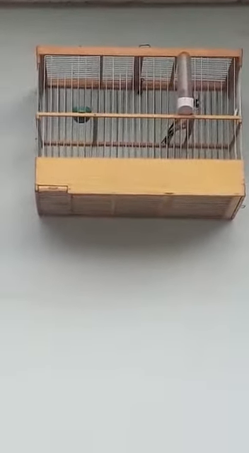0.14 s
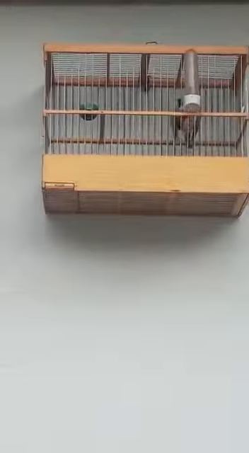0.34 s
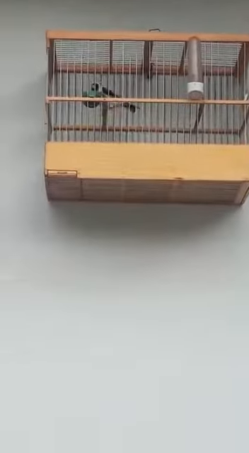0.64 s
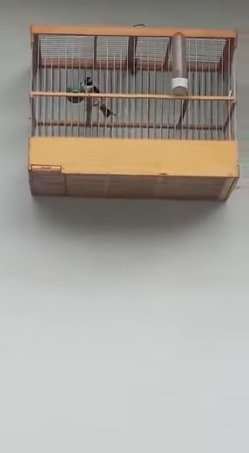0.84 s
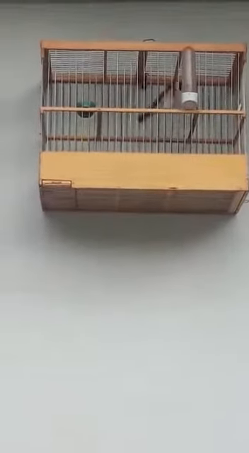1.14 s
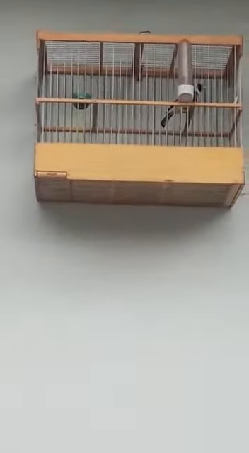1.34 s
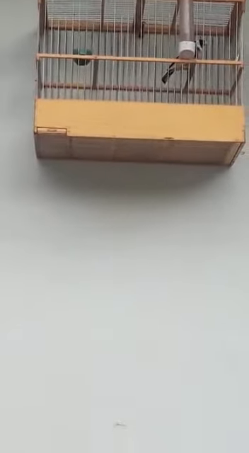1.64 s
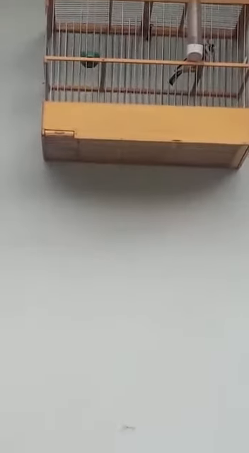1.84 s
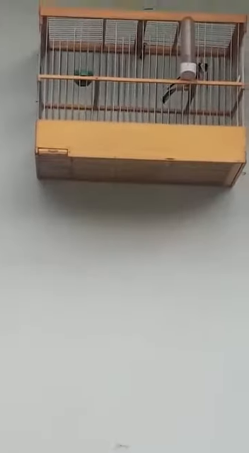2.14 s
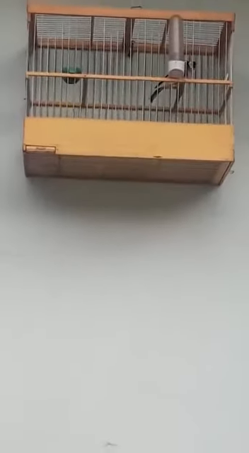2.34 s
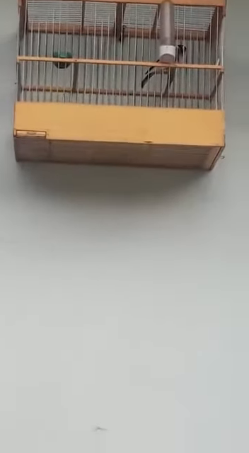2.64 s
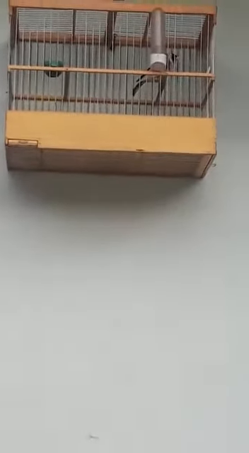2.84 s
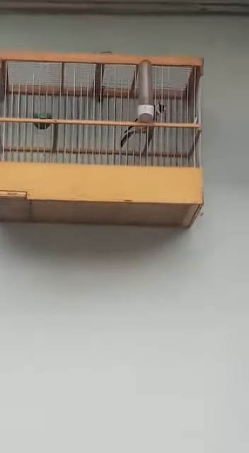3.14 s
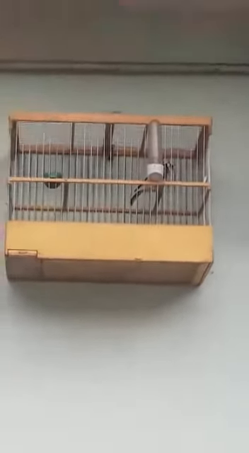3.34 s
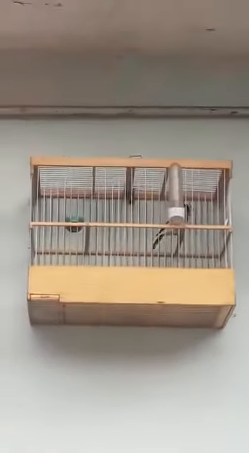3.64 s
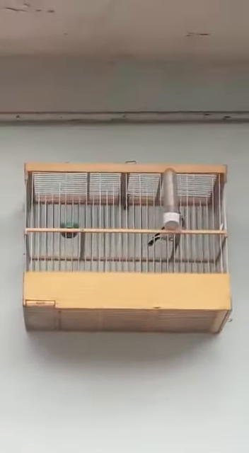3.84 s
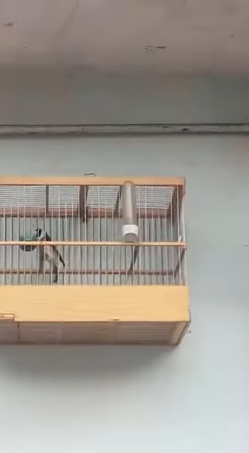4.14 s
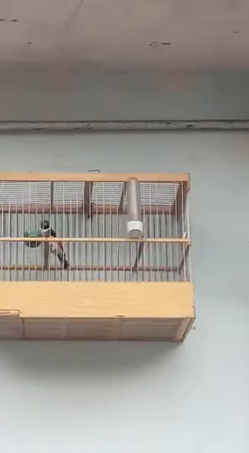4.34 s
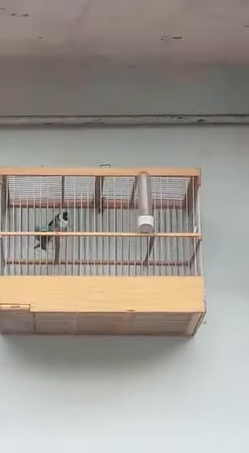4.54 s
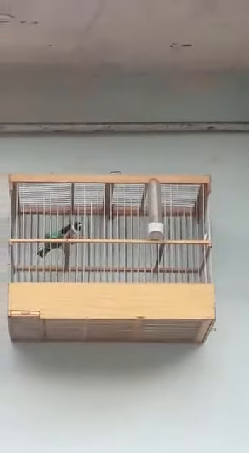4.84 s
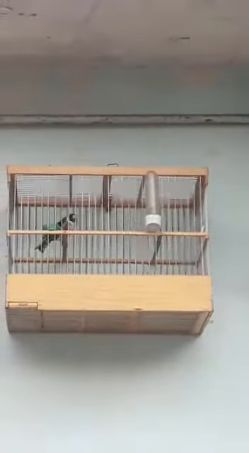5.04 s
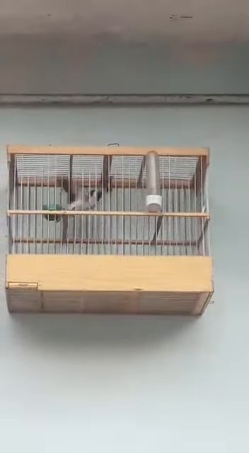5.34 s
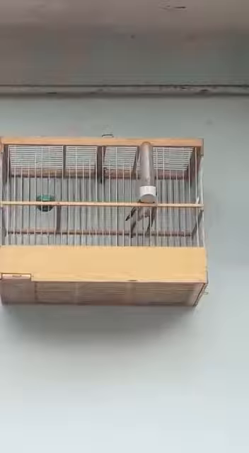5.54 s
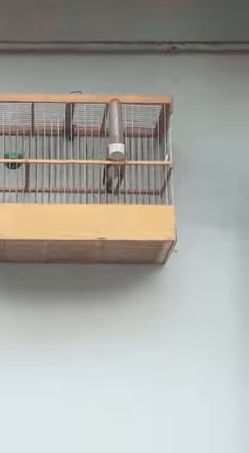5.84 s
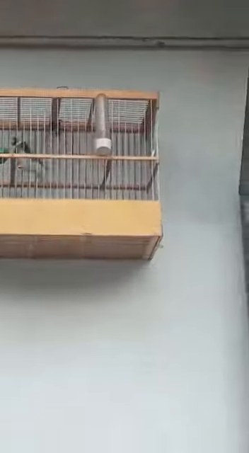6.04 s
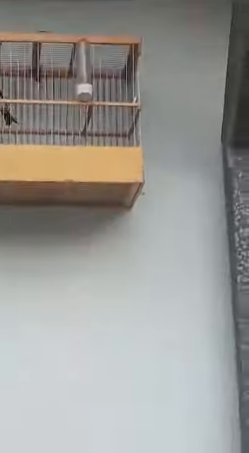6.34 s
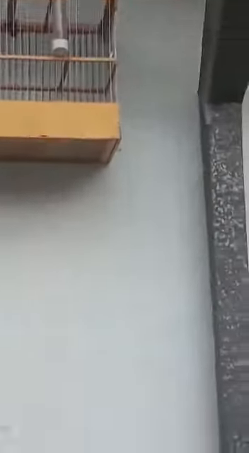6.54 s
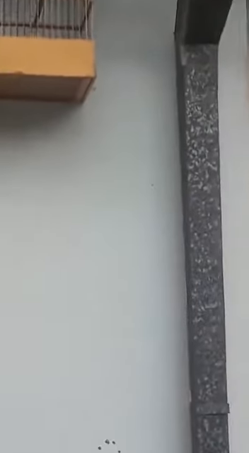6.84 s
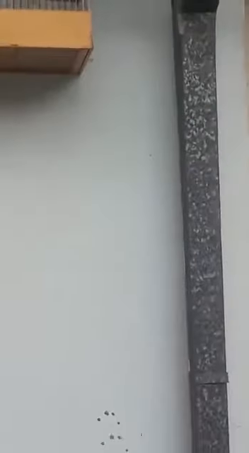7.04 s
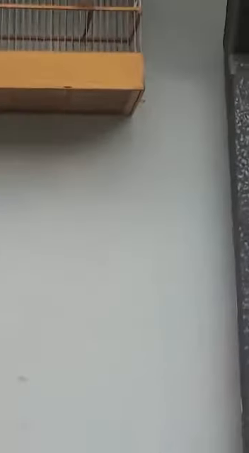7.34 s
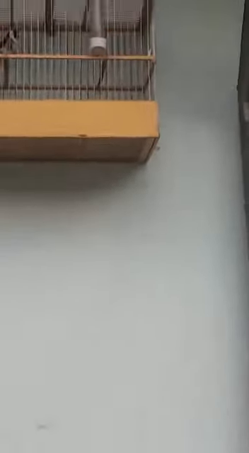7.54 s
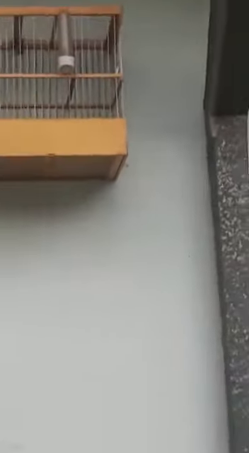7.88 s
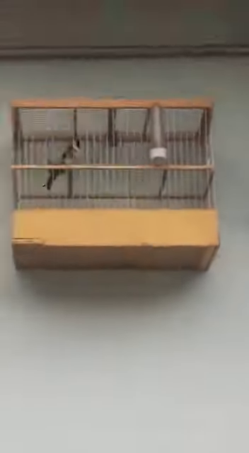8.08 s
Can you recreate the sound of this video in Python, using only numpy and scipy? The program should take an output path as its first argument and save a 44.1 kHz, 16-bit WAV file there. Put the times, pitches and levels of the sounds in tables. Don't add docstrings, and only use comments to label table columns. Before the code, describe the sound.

A small caged finch sings sharp descending trills and quick twitter calls in an echoing yard, with faint dove coos and distant chirping birds behind.

```python
import sys
import numpy as np
from scipy import signal
from scipy.io import wavfile
from scipy.ndimage import uniform_filter1d

SR = 44100
rng = np.random.default_rng(int(sys.argv[2]) if len(sys.argv) > 2 else 0)


def field_ratio(decibels):
    return 10 ** (np.asarray(decibels, dtype=float) / 20)


def int16_out(signal):
    q = np.round(np.clip(np.atleast_2d(signal).T, -1, 1) * 32767)
    wavfile.write(sys.argv[1], SR, q.astype(np.int16))


N = 362061
LEAD = SR // 4

# (time from onset [s], pitch [Hz], level [dB])
TEW = [(.013, 5450, -16.5), (.02, 5290, -2), (.027, 5256, -3), (.033, 4350, 1), (.042, 3550, -5),
       (.055, 2950, -13.5), (.075, 2520, -19), (.118, 2360, -34)]
TREE = [(.02, 6610, -7), (.03, 5950, -3), (.043, 5800, -14), (.05, 4892, -3), (.059, 4300, -4),
        (.066, 4144, -12.5), (.074, 3350, -7), (.082, 3002, -21.5), (.092, 2224, -33)]
FLICK = [(0, 6200, -16), (.004, 6870, -2), (.012, 9000, -18.5), (.02, 6740, -10)]
TIT = [(0, 2177, -23), (.006, 2908, -10.5), (.013, 3454, 0), (.026, 3540, -5.5), (.045, 3537, -15.5)]
WIT = [(0, 4300, -28), (.006, 4800, -12), (.014, 5250, -5), (.022, 5150, -8), (.034, 4850, -22)]
TWIK = [(0, 2764, -43), (.007, 3030, -12.5), (.016, 3957, -3), (.024, 4400, 1.5), (.034, 4050, -53)]
# (onset [s], level [dB], pitch factor [1])
TIT_CALLS = [
    (1.154, -18.5, 1.0),
    (3.643, -18.5, 0.99),
    (4.055, -19, 0.99),
]
WIT_CALLS = [
    (1.262, -11.5, 0.98),
    (3.743, -11.5, 0.99),
    (4.174, -13, 0.98),
]
TWIK_CALLS = [
    (1.389, -14.5, 1.0),
    (3.846, -13, 1.0),
]
TEW_TRILL = dict(start=-.196, gap=.146, count=6, top_db=-17.5, crest=0, swell_db=0, fade_db=0.61, sag=.001)
TREE_TRILL = dict(start=4.706, gap=.119, count=9, top_db=-16, crest=5.28, swell_db=1.37, fade_db=0.3, sag=-.004)
TREE_CODA = dict(start=5.791, gap=.1225, count=3, top_db=-19.5, crest=0, swell_db=0, fade_db=1.8, sag=0.0091)
TREE_PITCH, CODA_PITCH = 0.96, 0.94

# (frequency [Hz], level [dB per Hz])
TOWN_SPECTRUM = [(30, -32.5), (60, -9), (125, 3.5), (220, -20.5), (400, -7), (630, -6.5), (1200, -14.5),
                 (2200, -4.5), (3200, -15.5), (4500, -6.5), (6300, -6.5), (8500, -26.5), (11000, -18),
                 (16000, -15.5)]
TOWN_DB = -55

AIR_DB, AIR_FOLLOW_DB, AIR_WING_DB, AIR_SMEAR_S = -77.5, -62, -25, .03
FACING_S, FACING_DB, FACING_FOLLOW_DB = 6.69, 1.5, 9

# (time [s], level [dB])
CHORUS = [
    (0, -83),
    (1, -51),
    (2, -67),
    (2.599, -50),
    (3.299, -76),
    (4.2, -46),
    (6.301, -51.5),
    (8.21, -49),
]
# (start [s], first pitch [Hz], level [dB])
FALLING_CHIRPS = [(.883, 4900, -48.5), (1.639, 4860, -49.5), (1.933, 4060, -56), (2.275, 4690, -45),
                  (2.431, 6270, -49.5), (2.764, 4360, -44.5), (2.88, 7300, -60), (3.122, 5080, -43),
                  (3.54, 4940, -47), (4.092, 7500, -48), (8.031, 2293, -47.5), (8.149, 2230, -52)]
# (start [s], first pitch [Hz], level [dB])
RISING_CHIRPS = [(1.149, 4800, -40), (1.341, 2510, -47), (1.842, 5490, -45), (1.919, 4370, -47),
                 (2.657, 4790, -51), (3.207, 4260, -52), (3.644, 5180, -52.5), (6.553, 4080, -43.5),
                 (8.091, 1743, -45)]
FALL_S, FALL_BEND, RISE_S, RISE_BEND = .055, (.83, .67), 0.023, (1.14, 1.25)
# (start [s], length [s], pitch [Hz], level [dB])
PIPS = [(0.659, 0.053, 6510, -50.5), (1.259, 0.026, 6250, -39), (1.319, 0.037, 4530, -30.5),
        (1.409, .037, 6220, -45), (1.616, 0.042, 6720, -54), (1.843, 0.066, 4550, -39.5),
        (1.97, 0.092, 2280, -58), (2.342, 0.027, 6270, -46), (2.586, 0.047, 4413, -39.5),
        (3.741, 0.018, 6130, -39), (4.163, 0.017, 6200, -39), (4.52, 0.02, 4500, -32),
        (6.364, 0.015, 4463, -46.5), (6.389, 0.025, 4530, -35), (6.51, 0.024, 3780, -54),
        (6.734, .065, 6650, -59), (8.099, 0.054, 6756, -57)]
PIP_SAG = .02
# (start [s], length [s], pitch [Hz], level [dB])
THIN_WHISTLES = [(0.443, .21, 1520, -64.5), (.742, 0.17, 1581, -61), (1.03, 0.34, 1520, -63),
                 (0.899, 0.18, 990, -65), (1.75, .48, 1188, -71.5), (6.094, 0.36, 1041, -64.5),
                 (6.405, .35, 1293, -70.5)]

# (time from onset [s], length [s], top [Hz], end [Hz], level [dB])
COO_PHRASE = [
    (0, .12, 704, 614, 1.5),
    (.205, .15, 760, 670, 0),
    (.405, .14, 765, 667, 1),
    (.575, .1, 750, 630, 1.5),
    (.705, .09, 691, 600, 2.5),
    (.81, .095, 568, 466, -12),
]
# (onset [s], level [dB])
COO_TIMES = [
    (.172, -57),
    (1.91, -54),
    (3.652, -54.5),
    (5.385, -55),
    (7.115, -58),
]
COO_START = 0.77

# (start [s], attack [s], hold [s], level [dB], brightness [dB])
WINGS = [
    (5.334, 0.2, 0.042, -39, -1.5),
    (6.673, .025, .13, -65, 21.5),
]
# (centre [Hz], width [Hz], level [dB], share of brightness [1])
FEATHER_BANDS = [
    (486, 167, -4, -0.88),
    (1670, 710, -2, -0.19),
    (8600, 10400, 2, 0.94),
]
WING_RELEASE_S, WING_DEPTH_DB = 0.083, -30
# (time [s], peak [dB], centre [Hz], ring [s])
FOOT_TICKS = [(1.858, -48, 6500, 0.0045), (2.374, -32, 1800, 0.003), (2.589, -38, 6400, 0.0047),
              (2.81, -37, 6920, 0.0063), (3.319, -45, 6920, 0.0067), (5.36, -34, 990, 0.004),
              (5.475, -32, 530.2, 0.019), (5.513, -28, 1660, 0.0032), (5.542, -21.5, 670, 0.0051),
              (5.588, -23, 1610, 0.01), (6.39, -30, 6800, 0.0039), (6.705, -39, 110, 0.035)]

# (time from onset [s], pitch [Hz], level [dB])
CASCADE = [(0, 6720, -20), (.012, 6874, -4), (.031, 6780, -12.5), (.041, 6110, -3), (.052, 6010, -0.5),
           (.057, 4940, -3), (.066, 4580, 1.5), (.075, 3700, -11), (.088, 3190, -33)]
GLIDE = [(0, 5830, -31.5), (.017, 5290, -4.5), (.042, 4730, -1), (.077, 4143, -8), (.117, 3590, -22.5),
         (.147, 3250, -14.5), (.177, 3150, -20), (.192, 3220, -46)]
SWOOP = [(0, 5780, -16.5), (.01, 5300, -0.5), (.023, 4500, -1), (.043, 3494, -6), (.068, 2700, -21),
         (.108, 2030, -35), (.158, 1660, -40)]
RISE = [(0, 2290, -27), (.013, 3510, -14), (.029, 4250, 0), (.046, 4600, -10), (.065, 4900, -18)]
# (shape, onset [s], level [dB], pitch factor [1], pitch wobble [share])
SHAPED = [
    (CASCADE, 6.993, -15.5, 1.0, .016),
    (RISE, 7.098, -18, 1.0, .02),
    (GLIDE, 7.173, -8.5, 1.0, .005),
    (CASCADE, 7.737, -17.5, 0.99, .016),
    (RISE, 7.848, -17.5, .96, .015),
    (SWOOP, 7.924, -12.5, 1.0, .01),
]
# (onset [s], length [s], first pitch [Hz], held pitch [Hz], level [dB])
SLURS = [
    (6.842, 0.075, 4760, 5456, -27.5),
    (6.846, 0.045, 6200, 6735, -24.5),
    (7.449, 0.027, 5610, 8040, -12.5),
    (7.45, 0.037, 4600, 5970, -35),
    (7.501, 0.029, 2290, 3350, -33),
    (7.551, .058, 3200, 5355, -11),
    (7.611, 0.081, 5320, 5327, -20.5),
    (7.73, .045, 6790, 6900, -22),
    (7.785, 0.014, 7930, 6300, -22),
]
SLIDE_HZ_PER_S, SETTLE_S, RELEASE_SHARE, ATTACK_DB, RELEASE_DB = 110000, .008, 0.39, -14, -17

MIC_HZ, MIC_TOP_DB = 8755, -26


def band(x, hz, width):
    edges = [max(hz - width / 2, 15), min(hz + width / 2, .45 * SR)]
    y = signal.sosfilt(signal.butter(2, edges, "band", fs=SR, output="sos"), x)
    return y / np.sqrt(np.mean(y ** 2))


def high_pass(x, hz, order=2):
    return signal.sosfilt(signal.butter(order, hz, "high", fs=SR, output="sos"), x)


def walk(rate, size=N):
    k = int(SR / rate)
    held = np.repeat(rng.standard_normal(size // k + 1), k)
    return 1.094 * uniform_filter1d(uniform_filter1d(held, k), k)[:size]


def add(out, t, x):
    i = int(t * SR) + LEAD
    out[i:i + len(x)] += x[:len(out) - i]


def whistle(s, hz, db, second_db, third_db, rough_db, wobble, breath_db):
    t = np.arange(s[0], s[-1], 1 / SR)
    since = t - s[0]
    coarse = rng.standard_normal((2, 200))
    tremble, flutter = (np.interp(since * 350, np.arange(200), row) for row in coarse)
    pitch = uniform_filter1d(np.interp(t, s, hz), size=88, mode="nearest")
    speed = np.minimum(np.abs(np.gradient(pitch)) * SR / 40000, 1.5)
    pitch = pitch * (1 + (wobble + 0.01604 * speed) * tremble)
    phase = 2 * np.pi * np.cumsum(pitch) / SR
    tone = np.sin(phase) + field_ratio(second_db) * np.sin(2 * phase) + field_ratio(third_db) * np.sin(3 * phase)
    breath = np.interp(since * 2200, np.arange(1200), rng.standard_normal(1200))
    tone = tone * (1 + field_ratio(breath_db + 3.8 * speed) * breath)
    edges = np.minimum(np.minimum(since, s[-1] - t) / 0.0018, 1)
    return np.sqrt(2) * tone * edges * field_ratio(np.interp(t, s, db) + rough_db * flutter)


def stroke(length, first_hz, middle_hz, last_hz, db, edge_db, rough_db, wobble):
    u = np.linspace(0, 1, num=9)
    hz = first_hz * (1 - u) * (1 - 2 * u) + 4 * middle_hz * u * (1 - u) + last_hz * u * (2 * u - 1)
    fade_db = edge_db * np.abs(2 * u - 1) ** 3
    return whistle(u * length, hz, db + fade_db, -53, -67, rough_db, wobble, breath_db=-13.5)


def yard(x, direct_db, early_db, early_s, low_s, high_s, rise_s=0.0073):
    t = np.arange(SR * 3 // 4) / SR
    noise = rng.standard_normal((3, len(t))) * np.minimum(t / rise_s, 1)
    low = signal.lfilter(*signal.butter(2, 3000, fs=SR), noise[0])
    high = noise[0] - low
    tail = low * field_ratio(-60 * t / low_s) + high * field_ratio(-60 * t / high_s)
    early = noise[1] * field_ratio(3.0 * noise[2]) * field_ratio(-60 * t / early_s)
    response = tail / np.linalg.norm(tail) + field_ratio(early_db) * early / np.linalg.norm(early)
    response[0] = field_ratio(direct_db)
    return signal.fftconvolve(x, response)[LEAD:LEAD + N]


def trill(start, gap, count, top_db, crest, swell_db, fade_db, sag, pitch=1):
    k = np.arange(count)
    level_db = top_db - swell_db * np.maximum(crest - k, 0) - fade_db * np.maximum(k - crest, 0)
    return np.transpose([start + gap * k, level_db, pitch - sag * k])


def finch():
    out = np.zeros(N + LEAD)
    tews = trill(**TEW_TRILL)
    trees = np.vstack([trill(**TREE_TRILL, pitch=TREE_PITCH), trill(**TREE_CODA, pitch=CODA_PITCH)])
    # (shape, when, pitch wobble [share], second overtone [dB], unsteadiness [dB], breath [dB])
    voices = (
        (FLICK, tews + [0, -5, -.04], .04, -30, 3, -12),
        (TEW, tews, .012, -30, 3, -22),
        (FLICK, trees + [0, -2, .04], .025, -30, 3, -12),
        (TREE, trees, .011, -24, 2.5, -17),
        (TIT, TIT_CALLS, .003, -26, 1.5, -36),
        (WIT, WIT_CALLS, .012, -26, 3.5, -30),
        (TWIK, TWIK_CALLS, .012, -30, 3.5, -30))
    for shape, sung, wobble, second_db, rough_db, breath_db in voices:
        s, hz, db = np.transpose(shape)
        for t, level_db, factor in sung:
            note = whistle(s, hz * factor, db + level_db, second_db, -23, rough_db, wobble, breath_db)
            add(out, t + s[0], note)
    return out


def town():
    out, swell = 0, walk(1.0)
    where, db = np.transpose(TOWN_SPECTRUM)
    for hz in 45 * 2 ** np.arange(0, 8.1, .4):
        level_db = np.interp(np.log(hz), np.log(where), db) + 10 * np.log10(hz)
        level_db = level_db + 0.33 * swell + 2.0 * walk(6.0)
        out = out + field_ratio(level_db) * band(rng.standard_normal(N), hz, hz / 3.78)
    return out * field_ratio(TOWN_DB) / np.sqrt(np.mean(out ** 2))


def effort_db(start, attack, hold):
    s = start + np.cumsum([0, attack, hold, WING_RELEASE_S])
    levels_db = [WING_DEPTH_DB, 0, 0, WING_DEPTH_DB]
    return np.interp(np.arange(N) / SR, s, levels_db, left=-np.inf, right=-np.inf)


def air(sound):
    loud = np.sqrt(uniform_filter1d(sound ** 2, int(AIR_SMEAR_S * SR)) + 1e-12)
    facing = np.arange(N) / SR > FACING_S
    gain = field_ratio(AIR_DB + FACING_DB * facing) + field_ratio(AIR_FOLLOW_DB + FACING_FOLLOW_DB * facing) * loud
    for start, attack, hold, level_db, bright_db in WINGS:
        gain = gain + field_ratio(AIR_WING_DB + level_db + bright_db + effort_db(start, attack, hold) / 2)
    return gain * field_ratio(1.7 * walk(5.1)) * band(rng.standard_normal(N), 12500, 6000)


def neighbours():
    out = np.zeros(N + LEAD)
    arcs = [(t, FALL_S, hz, hz * FALL_BEND[0], hz * FALL_BEND[1], db, .035) for t, hz, db in FALLING_CHIRPS]
    arcs += [(t, RISE_S, hz, hz * RISE_BEND[0], hz * RISE_BEND[1], db, .04) for t, hz, db in RISING_CHIRPS]
    arcs += [(t, length, hz * (1 + PIP_SAG), hz, hz * (1 - PIP_SAG), db, .024) for t, length, hz, db in PIPS]
    arcs += [(t, length, hz, hz, hz, db - 3, .009) for t, length, hz, db in THIN_WHISTLES]
    for t, *arc, wobble in arcs:
        add(out, t, stroke(*arc, edge_db=-10, rough_db=4.5, wobble=wobble))
    s, chorus_db = np.transpose(CHORUS)
    for u, pitch, bend, size in rng.random((200, 4)):
        t = u * N / SR
        hz = 3000 * 2 ** (1.3 * pitch)
        middle_hz, last_hz = hz * (.95 + .1 * bend), hz * (0.63 + 0.341 * bend)
        db = np.interp(t, s, chorus_db) - 8 - 6 * size
        add(out, t, stroke(.04, hz, middle_hz, last_hz, db, edge_db=-0.5, rough_db=6.5, wobble=0.0301))
    return out


def dove():
    out = np.zeros(N + LEAD)
    for start, level_db in COO_TIMES:
        for t, length, top_hz, end_hz, db in COO_PHRASE:
            coo = stroke(length, COO_START * top_hz, top_hz, end_hz, db + level_db,
                         edge_db=-4, rough_db=3, wobble=.03)
            add(out, start + t, coo)
    return out


def cage():
    out = np.zeros(N + LEAD)
    spikes_db = 3.17 * np.minimum(rng.exponential(size=N // 40 + 1), 4.5) - 8
    beat_db = 3.9 * walk(90) + np.repeat(spikes_db, 40)[:N]
    for start, attack, hold, level_db, bright_db in WINGS:
        burst_db = beat_db + level_db + effort_db(start, attack, hold)
        for hz, width, db, share in FEATHER_BANDS:
            gain = field_ratio(burst_db + db + share * bright_db)
            add(out, 0, gain * band(rng.standard_normal(N), hz, width))
    out = high_pass(out, 280)
    ring = np.arange(SR // 5) / SR
    for start, db, hz, ring_s in FOOT_TICKS:
        strike = np.minimum(ring / 0.00046, 1)
        add(out, start, field_ratio(db - 60 * ring / ring_s) * strike * np.sin(2 * np.pi * hz * ring))
    return out


def slur(length, first_hz, held_hz, db):
    s = np.linspace(0, length, num=24)
    slide_s = SETTLE_S + abs(held_hz - first_hz) / SLIDE_HZ_PER_S
    slide = np.minimum(s / slide_s, 1)
    hz = first_hz + (held_hz - first_hz) * np.sin(np.pi / 2 * slide)
    release = np.maximum(1 - (1 - s / length) / RELEASE_SHARE, 0)
    return s, hz, db + ATTACK_DB * (1 - slide) + RELEASE_DB * release


def flourish():
    out = np.zeros(N + LEAD)
    notes = []
    for shape, t, level_db, factor, wobble in SHAPED:
        s, hz, db = np.transpose(shape)
        notes.append((t, s, hz * factor, db + level_db, wobble))
    notes += [(t, *slur(*note), .004) for t, *note in SLURS]
    for t, s, hz, db, wobble in notes:
        add(out, t, whistle(s, hz, db, second_db=-28.5, third_db=-21, rough_db=2.6, wobble=wobble,
                            breath_db=-29.5))
    return out


def scene():
    near = field_ratio(-4.5) * yard(finch(), direct_db=-0.5, early_db=1.5, early_s=0.074, low_s=0.6, high_s=0.43)
    far = field_ratio(0.5) * yard(neighbours(), direct_db=-27, early_db=-6.0, early_s=0.091, low_s=0.66,
                          high_s=0.53, rise_s=0.0064)
    across = field_ratio(-1.5) * yard(dove(), direct_db=1.0, early_db=-3.0, early_s=0.096, low_s=0.46, high_s=0.55)
    hops = field_ratio(-3) * yard(cage(), direct_db=7.5, early_db=-0.5, early_s=0.03, low_s=0.24, high_s=0.22)
    facing = field_ratio(-7) * yard(flourish(), direct_db=6, early_db=2.5, early_s=.09, low_s=.55, high_s=.38)
    return (near + far + across + hops + facing)[None] + town()


def band_limit(x):
    return signal.sosfilt(signal.butter(12, 15830, fs=SR, output="sos"), x)


def record(dry):
    bent = high_pass(dry ** 2, 9500, order=6)
    rounded = high_pass(np.tanh(1.096 * dry) / 0.95, 45)
    low = signal.sosfiltfilt(signal.cheby1(8, .2, MIC_HZ, fs=SR, output="sos"), rounded)
    shelf = field_ratio(MIC_TOP_DB) * (rounded - low)
    mix = low + shelf + field_ratio(-26.5) * bent + air(rounded)
    return band_limit(np.clip(mix, -.97, .97))


dry = scene()
out = record(dry)
int16_out(out)
```